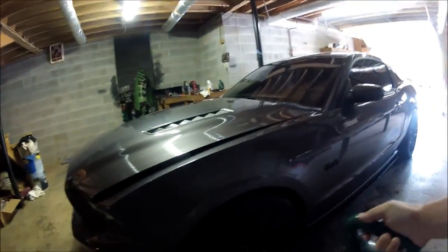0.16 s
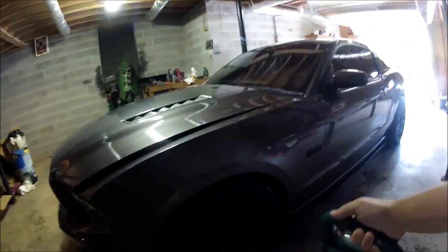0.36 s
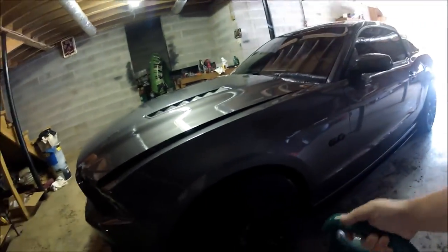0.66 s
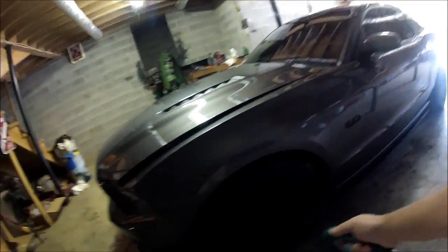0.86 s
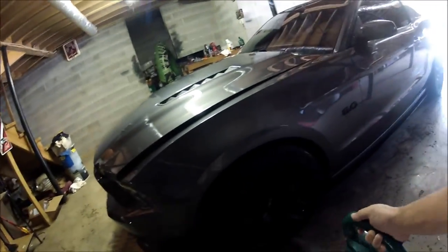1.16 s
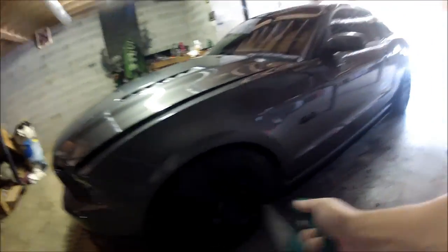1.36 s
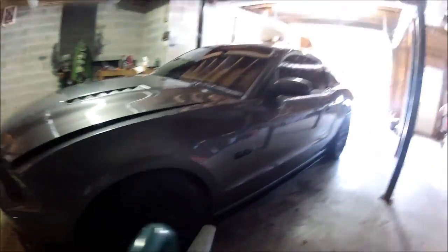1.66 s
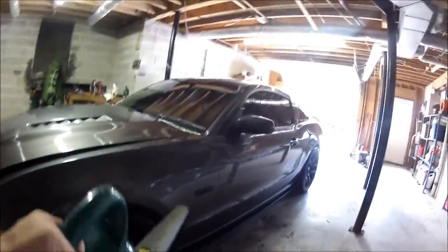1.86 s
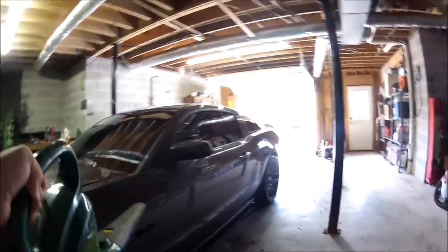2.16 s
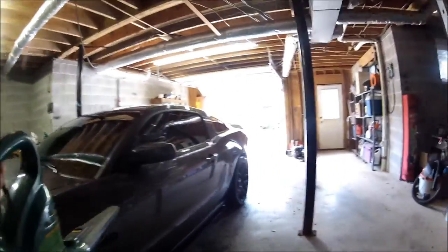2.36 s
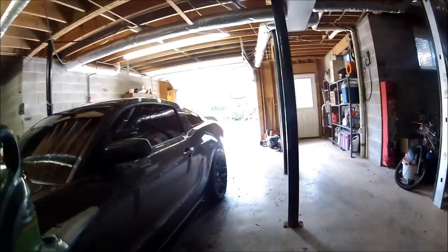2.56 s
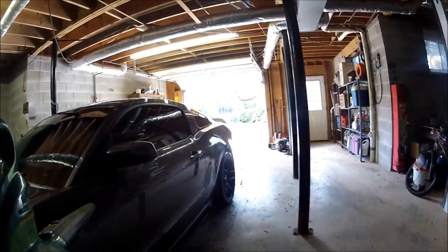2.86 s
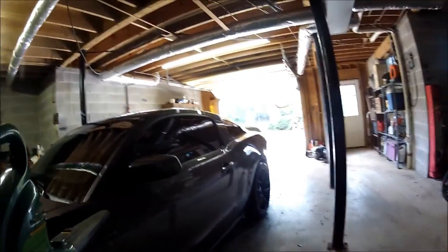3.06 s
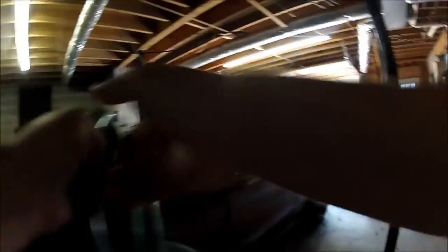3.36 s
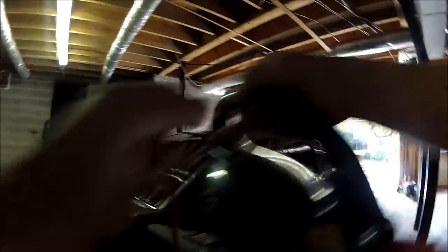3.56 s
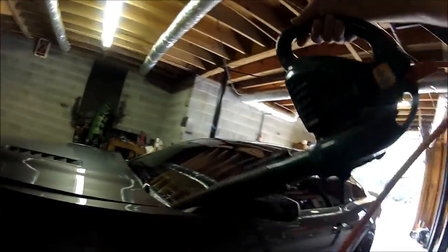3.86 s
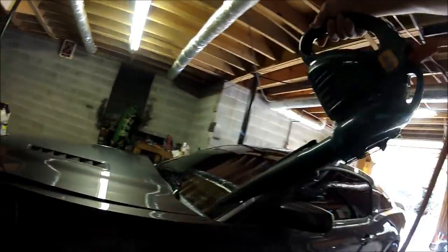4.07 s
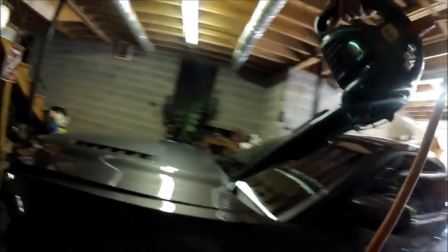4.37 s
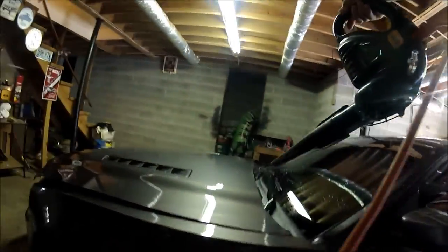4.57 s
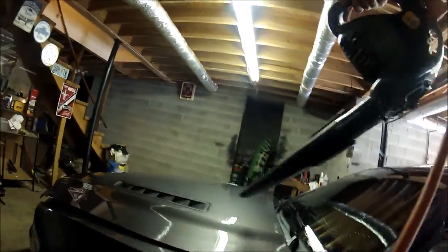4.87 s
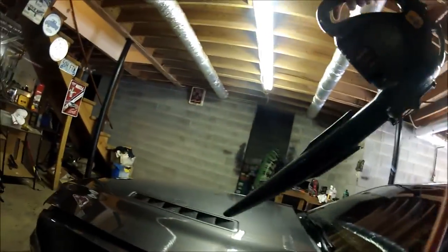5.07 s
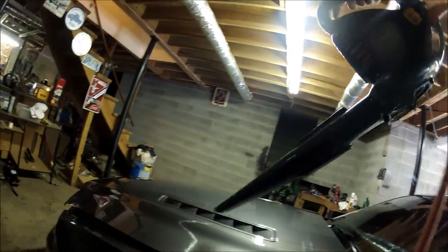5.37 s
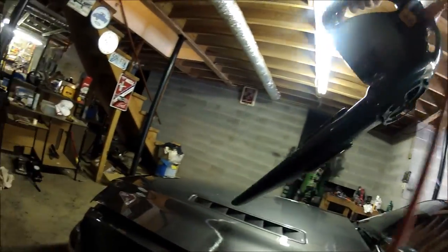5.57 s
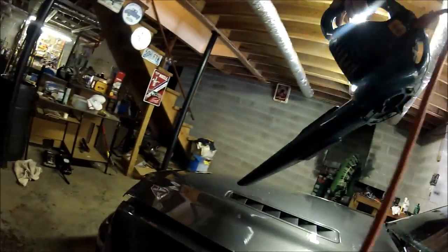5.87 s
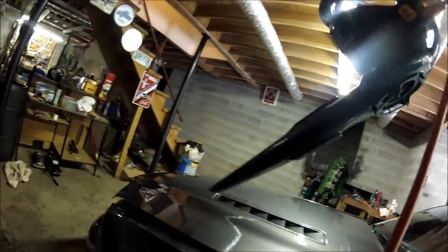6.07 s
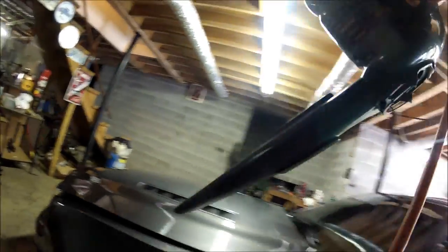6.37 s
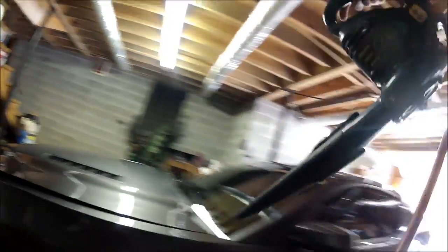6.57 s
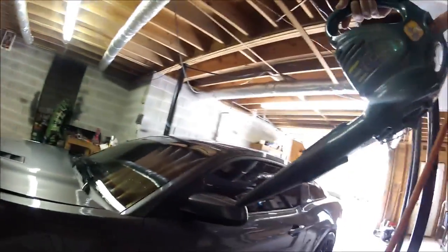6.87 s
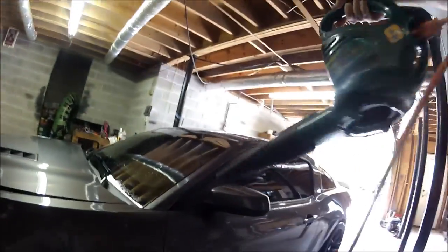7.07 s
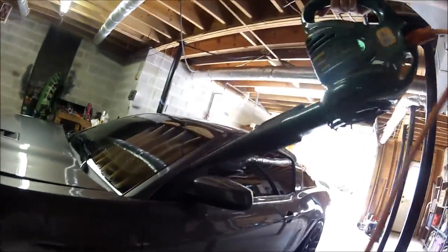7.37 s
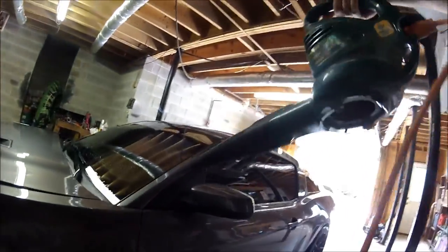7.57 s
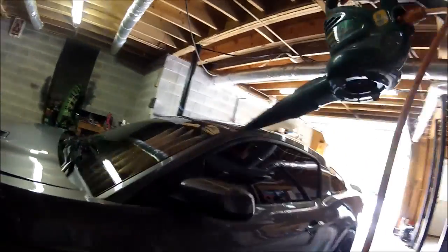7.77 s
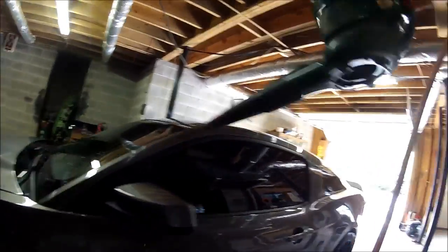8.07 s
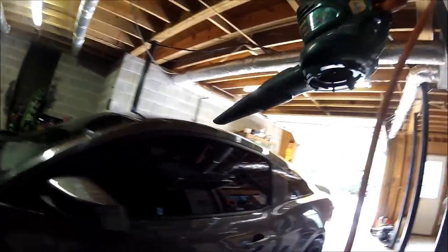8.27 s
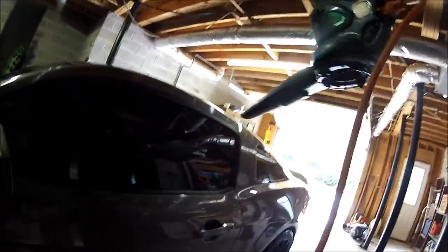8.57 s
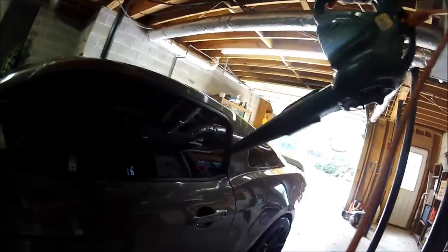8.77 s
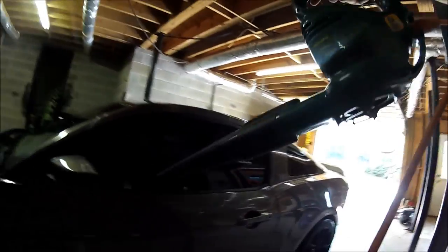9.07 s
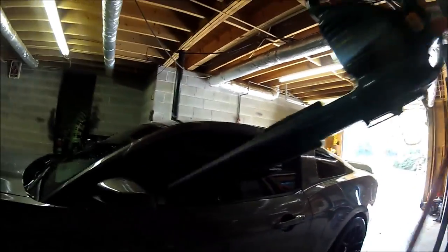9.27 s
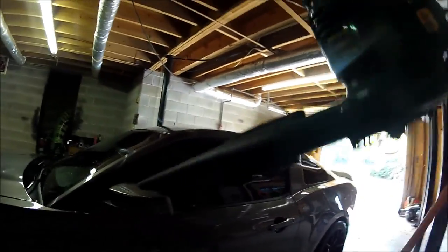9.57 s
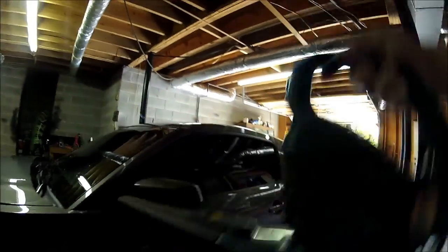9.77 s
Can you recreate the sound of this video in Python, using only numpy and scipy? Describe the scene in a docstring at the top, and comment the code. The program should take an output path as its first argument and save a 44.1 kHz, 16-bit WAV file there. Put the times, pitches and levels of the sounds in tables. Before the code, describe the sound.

A handheld electric leaf blower runs without a break, drying a car in a garage. Air roars through the tube and hisses over the paintwork, with a high, steady-pitched fan whine on top and a faint motor hum below. As the blower swings about, the whine flares and drops out, and the air dips and surges in response. The microphone is at arm's length.

```python
"""Leaf blower drying a car

In a block-walled garage, an electric blower runs at arm's length from a camera's microphone. Air roars
through the tube and hisses over the paintwork; the fan's blades whine and the motor hums with the mains.
As the blower is swung about, reflections make the whine flare and drop out. The camera's gain control
holds the treble steady, so the air ducks under the flares and surges in the gaps."""
import sys
import numpy as np
from scipy import signal
from scipy.fft import rfft, irfft
from scipy.io import wavfile

SR = 44100
rng = np.random.default_rng(int(sys.argv[2]) if len(sys.argv) > 2 else 0)


def unload_wav(signal):
    """Save mono or channel-first audio to the path in sys.argv[1] as 16-bit WAV at rate SR, clipped to [-1, 1]."""
    wavfile.write(
        sys.argv[1],
        SR,
        np.round(np.clip(np.atleast_2d(signal).T, -1, 1) * 32767).astype(np.int16),
    )


N = 437472
TIME = np.arange(N) / SR
BINS = np.fft.rfftfreq(N, 1 / SR)
FAN_BLADES, MOTOR_ORDER = 13, 15   # cycles of each whine per turn of the shaft


def from_db(db):
    """Decibels to gain."""
    return 10 ** (np.asarray(db) / 20)


def rms_one(x):
    """Scale to unit power."""
    return x / np.sqrt(np.mean(np.abs(x) ** 2) + 1e-20)


def in_time(rows):
    """One value per sample for each column after the first, which is time in seconds."""
    seconds, *columns = np.transpose(rows)
    return [np.interp(TIME, seconds, column) for column in columns]


def drift(rate):
    """Smooth random motion of spread 1, about `rate` changes a second."""
    hop, settle = 40, 4000
    pole = np.exp(-2 * np.pi * rate * hop / SR)
    noise = rng.standard_normal(N // hop + settle + 2)
    slow = signal.lfilter([1], [1, -2 * pole, pole * pole], noise)[settle:]
    return np.interp(np.arange(N) / hop, np.arange(len(slow)), rms_one(slow))


def swings(events):
    """Sum of bell-shaped level changes, in dB."""
    return sum(db * np.exp(-2 * ((TIME - centre) / length) ** 2) for centre, length, db in events)


def turbulence(colour):
    """Noise of the given colour, rms 1."""
    hz, db = np.transpose(colour)
    gain = from_db(np.interp(np.log(BINS + 1e-3), np.log(hz), db, left=-120, right=-120))
    return rms_one(irfft(rfft(rng.standard_normal(N)) * gain, N))


def blown(hz, width_hz):
    """A resonance excited by the air stream, rms 1."""
    band = signal.butter(2, [hz - width_hz / 2, hz + width_hz / 2], "band", fs=SR, output="sos")
    return rms_one(signal.sosfilt(band, rng.standard_normal(N)))


def tone(cycles, wall_share, fade_rate):
    """A direct tone plus its many wall reflections, whose sum wanders in strength and phase."""
    share = np.clip(wall_share, 0, 1)
    walls = rms_one(drift(fade_rate) + 1j * drift(fade_rate))
    paths = np.sqrt(1 - share) + np.sqrt(share) * walls
    return np.real(paths * np.exp(2j * np.pi * cycles))


def air_stream():
    """Panel rumble, tube roar, free jet and its hiss on the car; flutter shakes jet and hiss together."""
    # The air changes with where the nozzle points. Each row: time in seconds, then relative levels
    # in dB of tube roar, jet rush, hiss on the car and rumble on the panels.
    air_levels = [(0.0, -15.5, -22, -23, -24), (1.15, -18.5, -23.5, -26.5, -28.5),
                  (1.55, -19.5, -28.5, -32, -29.5), (1.8, -16.5, -24.5, -30, -25),
                  (2.55, -18.5, -26, -30.5, -28.5), (3.45, -15.5, -24.5, -28, -27),
                  (3.7, -16, -20.5, -24.5, -27.5), (3.95, -19, -22, -29.5, -27.5),
                  (4.7, -20, -24.5, -32.5, -28.5), (5.15, -20.5, -25.5, -30, -30),
                  (5.95, -21.5, -25, -30.5, -35), (6.3, -17, -22.5, -31, -24), (7.0, -20, -23, -32, -31.5),
                  (7.6, -22, -23.5, -30, -32.5), (8.15, -22.5, -25, -35, -34),
                  (8.6, -20.5, -22, -29.5, -34), (9.35, -20, -23.5, -33, -29.5),
                  (9.92, -14, -20, -24.5, -24.5)]
    # The colours of those four sounds. Each row: frequency in Hz, relative spectral level in dB.
    roar_colour = [(350, -51), (520, -13.5), (680, -0.5), (830, 5), (1030, 7.5), (1280, 3), (1420, 0),
                   (1570, -6), (1760, -9), (1950, -23.5), (3500, -54)]
    rush_colour = [(1000, -27), (1650, -2.5), (2100, 7), (2900, 6), (3400, 3.5), (4400, 4.5), (5400, 8),
                   (6300, 3), (7000, -3.5), (7500, -9), (10000, -34)]
    hiss_colour = [(3500, -49), (5300, 9), (6700, 10), (7400, 5), (7780, 7.5), (8600, 2.5), (9400, 4),
                   (10300, 1.5), (11000, -6.5), (11600, -8), (12000, -17)]
    rumble_colour = [(20, -46), (45, -35), (80, -30), (140, -21.5), (180, -21.5), (215, -16.5), (290, -9),
                     (335, -5), (390, -1.5), (480, 1), (600, 0), (800, -19), (1200, -49)]
    # The tube's upper resonance, heard while the blower is held low.
    # Each row: time in seconds, level in dB against the roar.
    tube_ring = [(0, -15), (3.4, -20), (3.9, -18.5), (9.92, -36)]
    # The nozzle's resonances. Each row: frequency in Hz, width in Hz, relative level in dB.
    nozzle_modes = [(2373, 150, -14.5), (2774, 110, -13.5), (4100, 140, -14)]
    # They ring more once the nozzle is lifted over the car. Each row: time in seconds, change in dB.
    nozzle_ring = [(0, -2), (1.3, -4.5), (3.0, -5), (4.0, -7), (6.0, 1), (8.5, -5.5), (9.92, 0.5)]
    roar_db, rush_db, hiss_db, rumble_db = in_time(air_levels)
    tube_db, = in_time(tube_ring)
    ring_db, = in_time(nozzle_ring)
    flutter = drift(17)
    rumble = from_db(rumble_db - 1.6 + 0.57 * drift(11.0)) * turbulence(rumble_colour)
    roar_gain = from_db(roar_db - 1.42 + 1.26 * drift(35))
    roar = roar_gain * (turbulence(roar_colour) + from_db(tube_db) * blown(hz=1565, width_hz=610))
    rush = from_db(rush_db - 1.4 + 0.5 * flutter) * turbulence(rush_colour)
    hiss = from_db(hiss_db - 0.54 + 0.8 * flutter) * turbulence(hiss_colour)
    nozzle = sum(from_db(rush_db + ring_db + db + 1.5 * drift(2.7)) * blown(hz, width)
                 for hz, width, db in nozzle_modes)
    return rumble + roar + rush + hiss + nozzle


def garage(direct):
    """Early reflections whose paths lengthen and shorten as the blower moves; the power is kept."""
    # Bounces off the car, floor and ceiling.
    # Each row: delay in seconds, its sway in seconds, level in dB against the direct sound.
    reflections = [(.0016, 0.00011, -15.5), (.0046, 0.00025, -17), (0.0109, 0.00044, -19.5),
                   (.019, 0.000504, -15)]
    heard, power = direct, 1
    for delay, sway, db in reflections:
        bounce = np.interp(TIME - delay - sway * drift(0.307), TIME, direct, left=0)
        heard = heard + from_db(db) * bounce
        power += from_db(db) ** 2
    return heard / np.sqrt(power)


def fan_whine(turns):
    """Blade-pass whine, shaken by the uneven inflow, with the motor's whine and fainter overtones."""
    # The blades, strong and steady while the intake is held up beside the microphone.
    # Each row: time in seconds, relative level in dB, share off the walls (0 to 1) between flares.
    blade_whine = [(0, -23, 0.6), (1.0, -26.5, 0.4), (3.4, -29, 0), (3.9, -22.5, 0), (5.0, -24.5, 0.09),
                   (6.5, -21, 0), (6.8, -27.5, 0.34), (8.5, -27, 0.1), (9.92, -22.5, 0.35)]
    # The whine's beam sweeps past the microphone. Each row: centre and length in seconds, rise in dB.
    flares = [(0.2, 0.063, 8), (1.27, .07, 6.5), (1.56, 0.12, 7), (2.03, 0.029, 3), (2.15, 0.044, 8.5),
              (2.86, 0.099, 4), (3.2, 0.092, 6), (3.58, 0.1, 7), (3.8, 0.056, 9), (4.05, .09, 4.5),
              (4.89, .08, 3), (6.6, .03, 8), (7.14, .05, 7.5), (7.35, 0.064, 8), (7.66, 0.095, 8.5),
              (8.12, .1, 6), (8.51, 0.032, 6), (8.74, 0.034, 3), (9.28, 0.038, 6)]
    # Its paths cancel at the microphone. Each row: centre and length in seconds, change in dB.
    dropouts = [(0.38, 0.089, -7), (2.69, 0.037, -8), (3.04, 0.093, -2), (3.69, 0.046, -13),
                (4.17, 0.052, -8), (4.75, 0.074, -11), (5.13, 0.061, -7), (5.75, 0.07, -7), (6.89, .07, -7),
                (7.25, 0.048, -5), (7.49, .065, -8), (7.85, 0.21, -6), (8.59, 0.054, -12), (8.9, .04, -14)]
    # The motor's own, higher whine. Each row: time in seconds, relative level in dB.
    motor_whine = [(0.0, -34), (2.5, -35.5), (3.25, -46), (3.38, -27), (3.9, -31), (5.0, -41), (5.4, -43),
                   (6.55, -44), (6.75, -38.5), (8.4, -35), (9.92, -34)]
    # Faint shaft overtones. Each row: multiple of the shaft speed, level in dB.
    shaft_overtones = [(12, -43), (26, -46)]
    whine_db, wall_share = in_time(blade_whine)
    motor_db, = in_time(motor_whine)
    flare_db = swings(flares)
    wall_share = wall_share / from_db(flare_db) ** 2   # a flare is direct sound
    blade_db = whine_db + flare_db + swings(dropouts) + 0.46 * drift(70)
    blades = from_db(blade_db + 5.0) * tone(FAN_BLADES * turns, wall_share, fade_rate=12.2)
    motor = from_db(motor_db + 4.0) * tone(MOTOR_ORDER * turns, wall_share=0.4, fade_rate=9.8)
    overtones = sum(from_db(db) * tone(multiple * turns, wall_share=0.65, fade_rate=9.6)
                    for multiple, db in shaft_overtones)
    return blades + motor + overtones


def motor_hum(turns, mains_hz=60):
    """The unbalanced rotor hums at multiples of the shaft speed, and the motor buzzes with the mains."""
    # Loudest with the housing close to the microphone. Each row: time in seconds, level in dB.
    hum_level = [(0.0, -47), (1.02, -38.5), (1.77, -28), (2.46, -27.5), (3.45, -27), (4.02, -29),
                 (4.89, -54), (5.64, -43), (6.81, -39.5), (9.92, -29.5)]
    # Rotor tones. Each row: multiple of the shaft speed, level in dB against the hum.
    shaft_tones = [(1, -4.5), (2, 1)]
    # Buzz tones. Each row: multiple of the mains frequency, level in dB against the hum.
    mains_tones = [(4, -21.5), (11, -1.5), (15, -1.5), (22, -4)]
    hum_db, = in_time(hum_level)
    shaft = sum(from_db(db) * tone(multiple * turns, wall_share=0.095, fade_rate=2.5)
                for multiple, db in shaft_tones)
    mains = sum(from_db(db) * tone(multiple * mains_hz * TIME, wall_share=0.26, fade_rate=1.9)
                for multiple, db in mains_tones)
    return from_db(hum_db) * (shaft + mains)


def hoots_and_whistles():
    """Brief hoots and whistles in the air stream, including swells of the nozzle's ring."""
    # Each row: centre and spread in seconds, pitch and bandwidth in Hz, level at the centre in dB.
    swells = [(0.12, 0.059, 2680, 900, -23), (0.346, 0.058, 217, 130, -45),
              (0.547, 0.011, 4700, 1300, -20.5), (1.067, 0.17, 714, 170, -22.5),
              (1.586, 0.17, 1133, 139, -19.5), (1.696, 0.045, 185, 37, -37), (2.323, 0.035, 423, 90, -26),
              (2.523, 0.029, 414, 89, -24), (2.53, 0.082, 805, 60, -21.5), (4.25, .2, 2770, 110, -36),
              (6.275, 0.07, 520, 150, -26), (6.277, 0.061, 1080, 250, -20), (6.35, .15, 2760, 110, -31),
              (6.566, 0.054, 487, 200, -23), (7.67, 0.019, 9300, 1100, -29), (7.88, 0.14, 2770, 110, -31.5),
              (8.34, 0.1, 1335, 127, -28)]
    return sum(from_db(db) * np.exp(-.5 * ((TIME - centre) / spread) ** 2) * blown(hz, width)
               for centre, spread, hz, width, db in swells)


def gain_control(x, hold_db=-18, detector_hz=2060, average_s=0.025, range_db=9):
    """The camera turns everything down when the treble grows and up when it fades."""
    treble = signal.sosfilt(signal.butter(1, detector_hz, "high", fs=SR, output="sos"), x)
    power_ratio = (treble / from_db(hold_db)) ** 2
    pole = np.exp(-1 / (average_s * SR))
    averaged = 1 + signal.lfilter([1 - pole], [1, -pole], power_ratio - 1)   # starts at unity gain
    gain_db = -10 * np.log10(averaged + 1e-9)
    return x * from_db(np.clip(gain_db, -range_db, range_db))


def converter(x, rate_hz=24000, cutoff_hz=15750):
    """The camera's slow converter mirrors the treble about half its rate; then the top is cut."""
    highpass = signal.butter(8, 7800, "high", fs=SR, output="sos")
    treble = signal.hilbert(signal.sosfilt(highpass, x))
    mirror = np.real(np.conj(treble) * np.exp(2j * np.pi * rate_hz * TIME))
    mirror_db = np.interp(BINS, [13000, 14400, 15700], [-2.5, -4, -5.5])
    spectrum = rfft(x) + from_db(mirror_db) * rfft(mirror)
    return irfft(spectrum / np.sqrt(1 + (BINS / cutoff_hz) ** 600), N)


def scene():
    """One shaft drives all the whines, wavering with the load; the air sounds through the garage."""
    # The fan's speed. Each row: time in seconds, blade-pass pitch in Hz.
    fan_speed = [(0.0, 5464.0), (0.45, 5459.5), (1.5, 5460.0), (1.89, 5452.0), (6.81, 5430.0),
                 (7.32, 5436.0), (7.71, 5431.0), (8.79, 5434.5), (9.12, 5426.5), (9.92, 5436.0)]
    blade_hz, = in_time(fan_speed)
    shaft_hz = (blade_hz + 3 * drift(4.7)) / FAN_BLADES
    turns = np.cumsum(shaft_hz) / SR
    return (garage(air_stream()) + hoots_and_whistles() + fan_whine(turns) + motor_hum(turns))[None]


def record(dry):
    """The camera's mono microphone feeds its gain control, then its converter."""
    return converter(gain_control(dry))


dry = scene()
out = record(dry)
unload_wav(out)
```